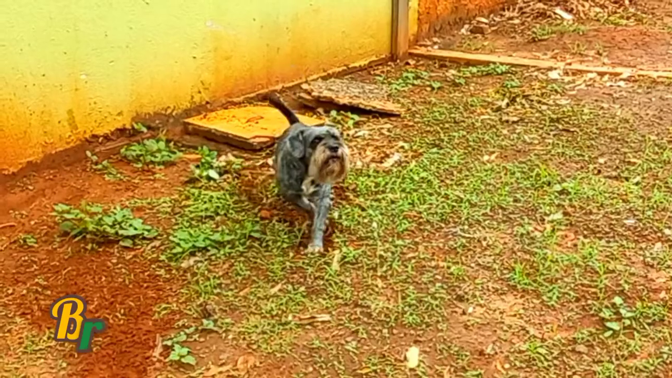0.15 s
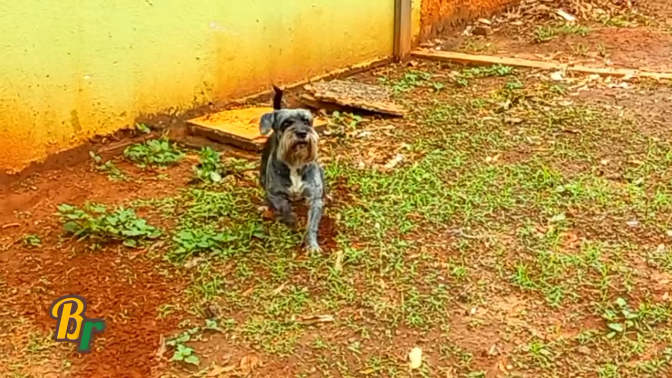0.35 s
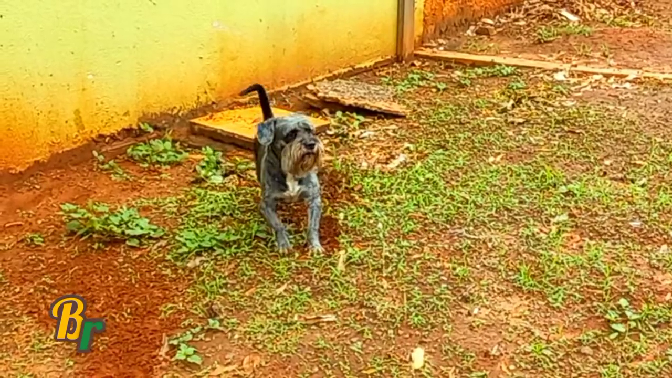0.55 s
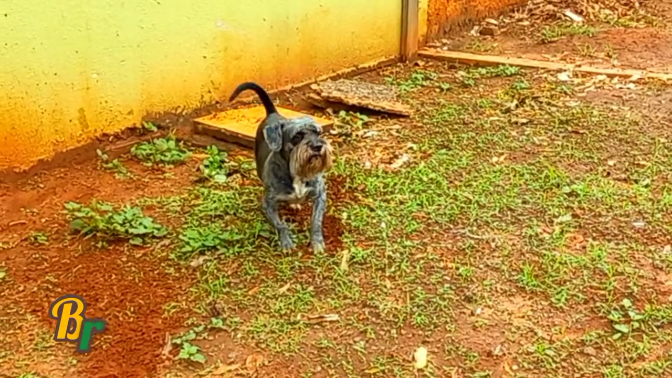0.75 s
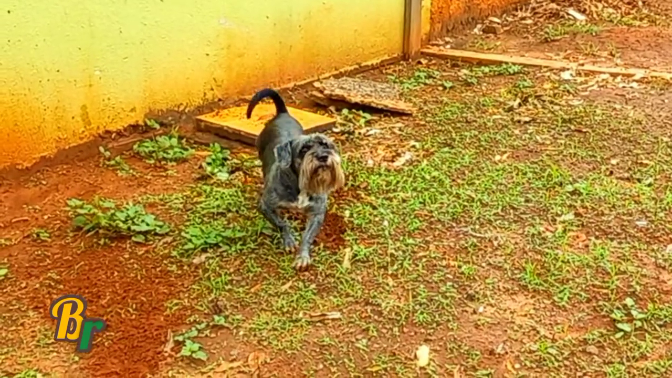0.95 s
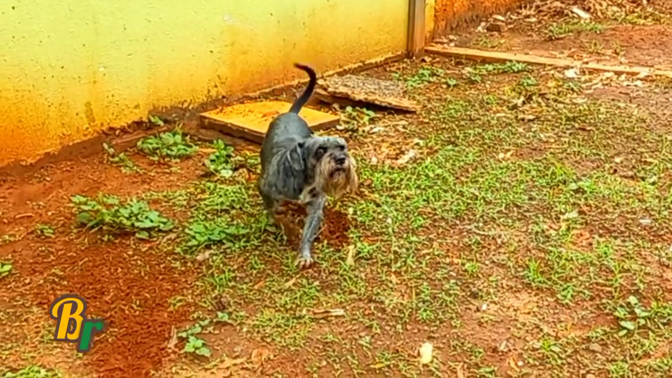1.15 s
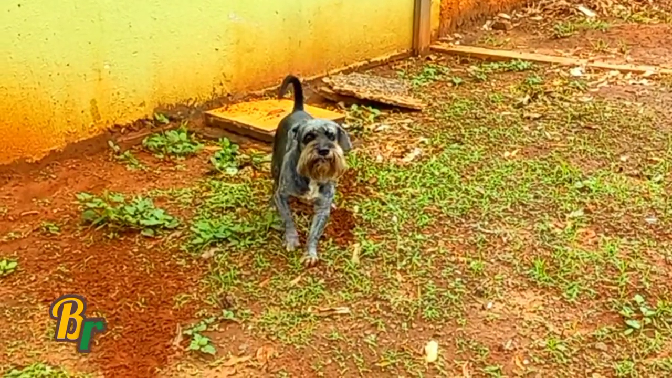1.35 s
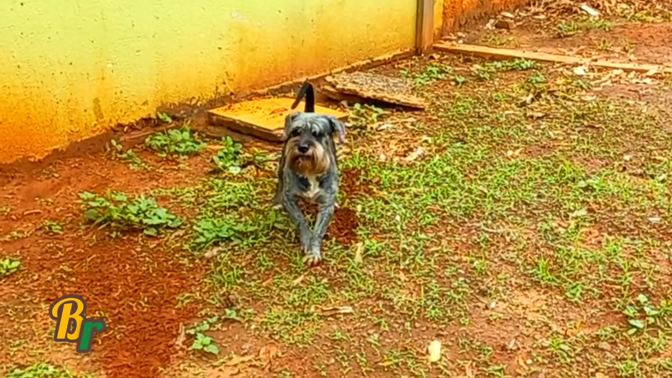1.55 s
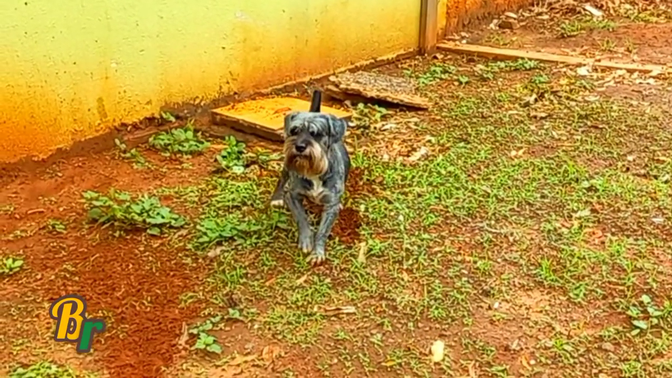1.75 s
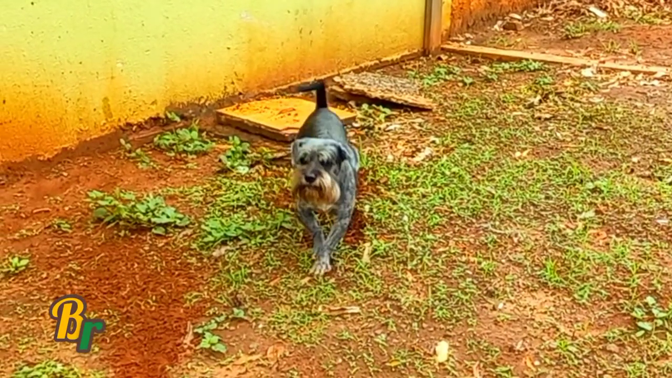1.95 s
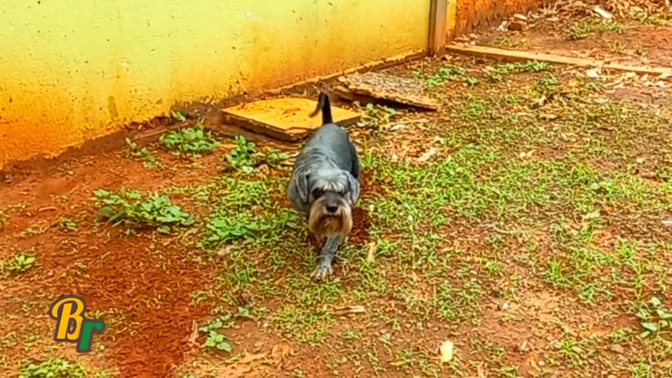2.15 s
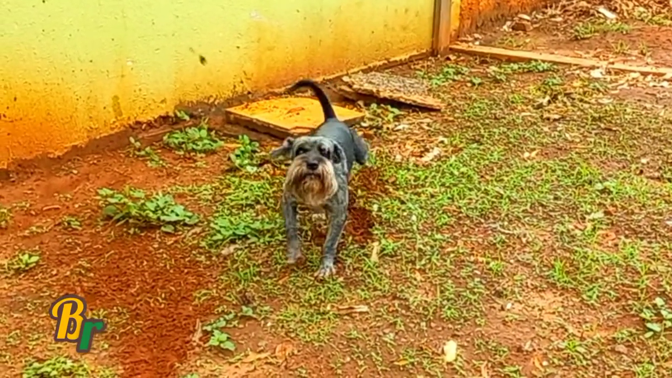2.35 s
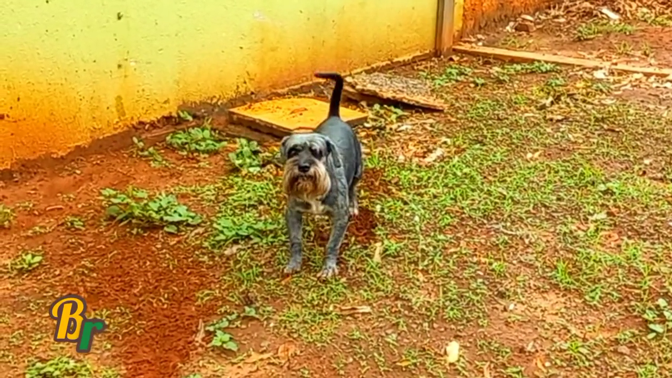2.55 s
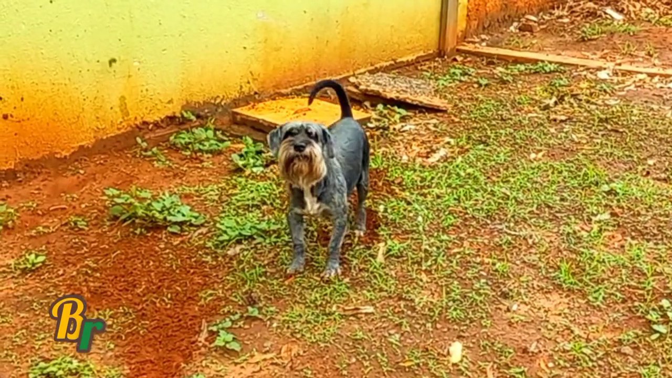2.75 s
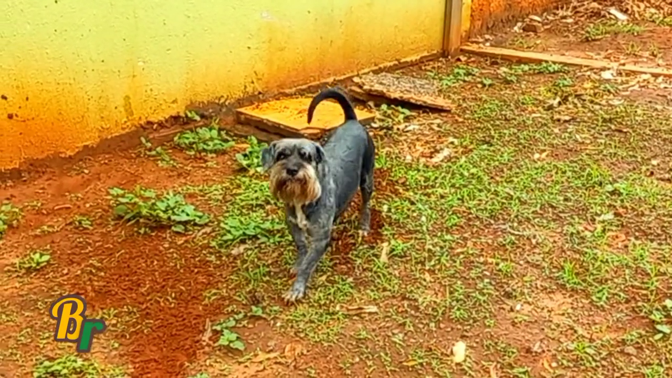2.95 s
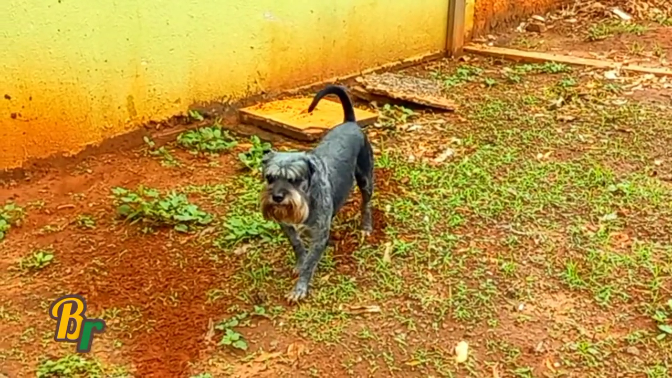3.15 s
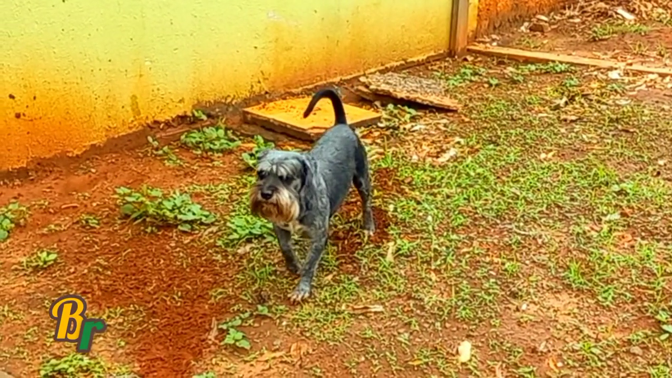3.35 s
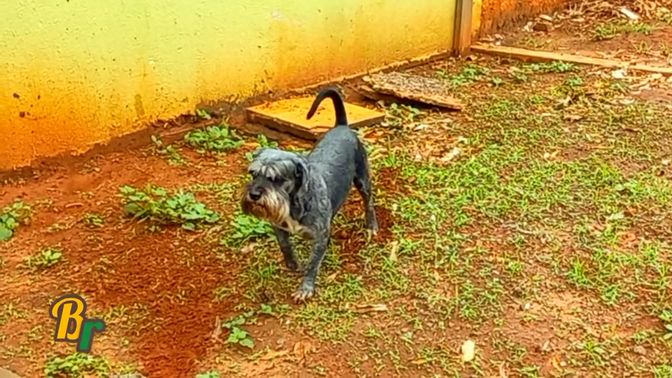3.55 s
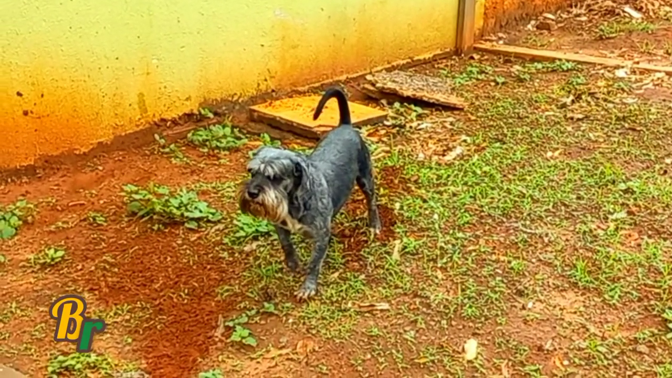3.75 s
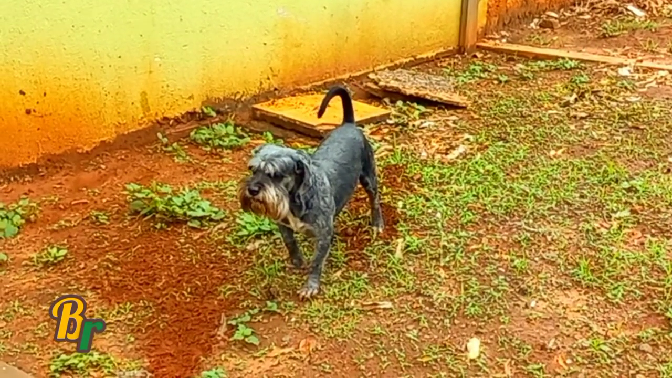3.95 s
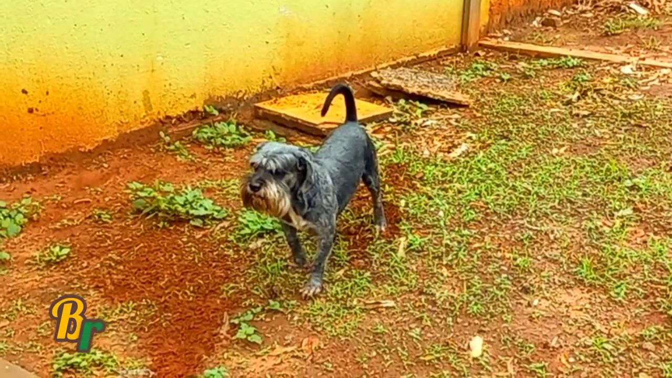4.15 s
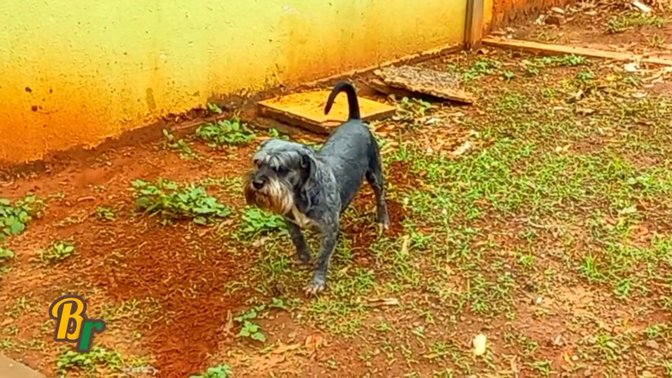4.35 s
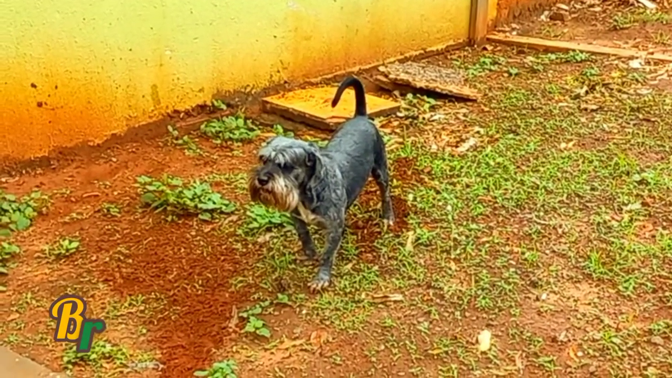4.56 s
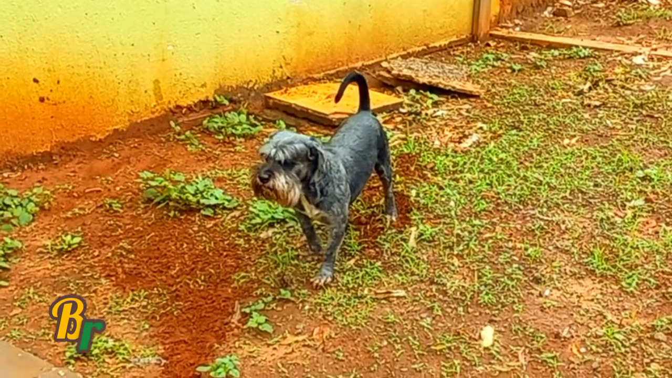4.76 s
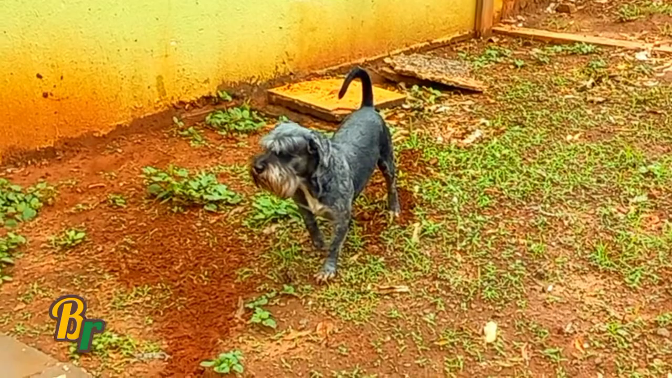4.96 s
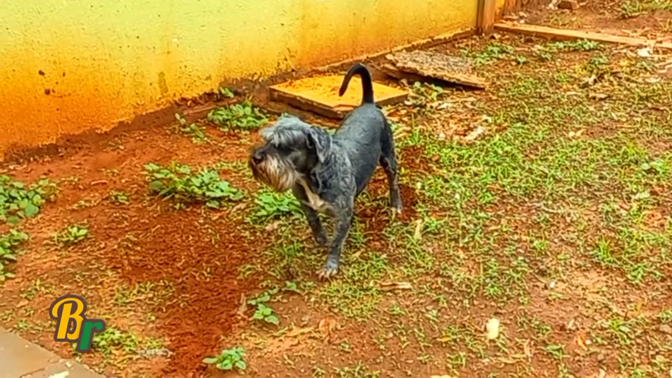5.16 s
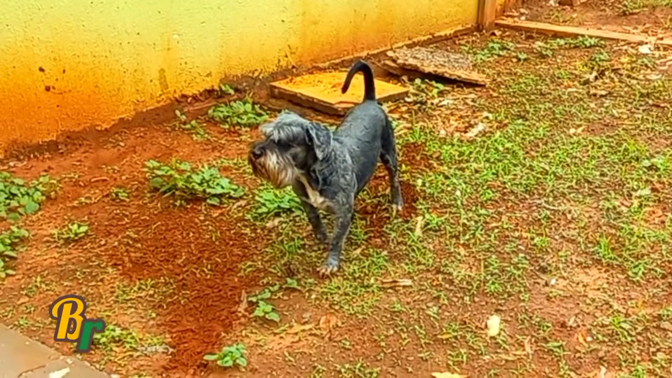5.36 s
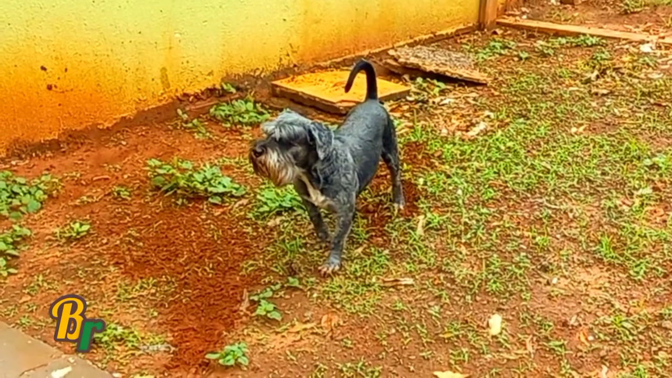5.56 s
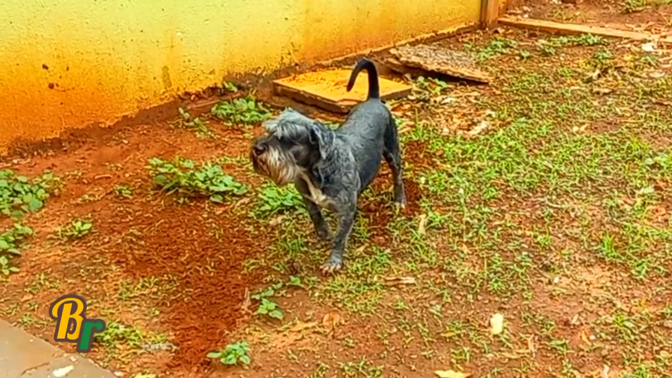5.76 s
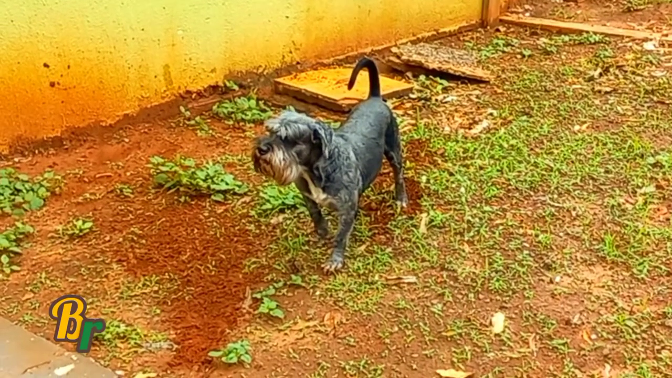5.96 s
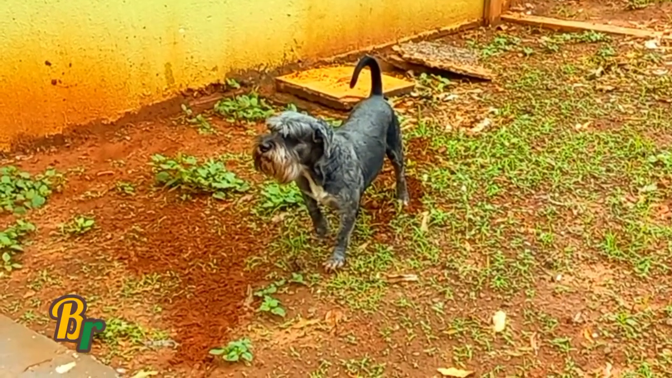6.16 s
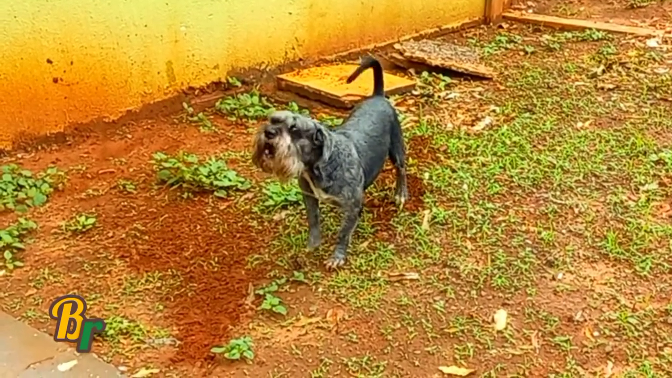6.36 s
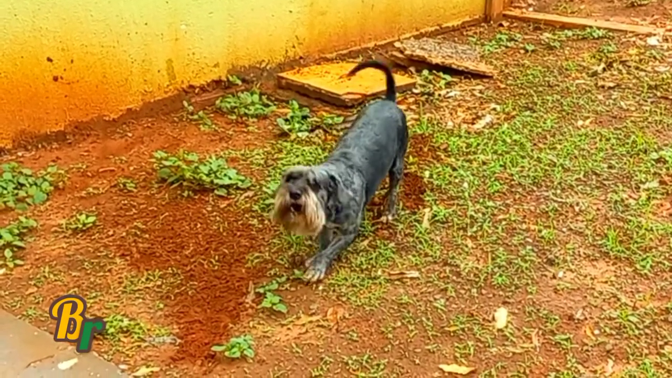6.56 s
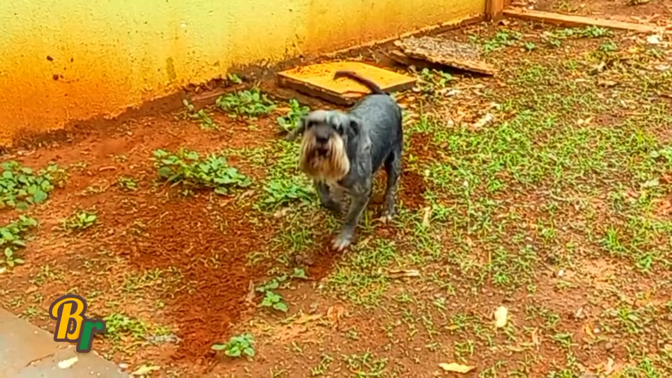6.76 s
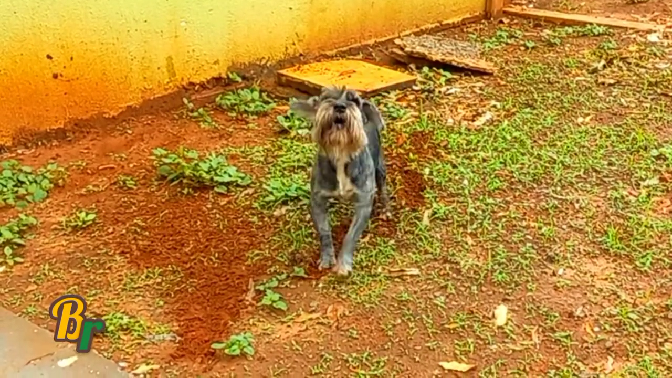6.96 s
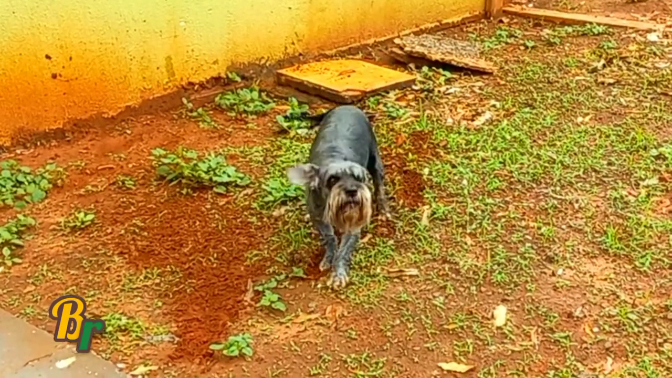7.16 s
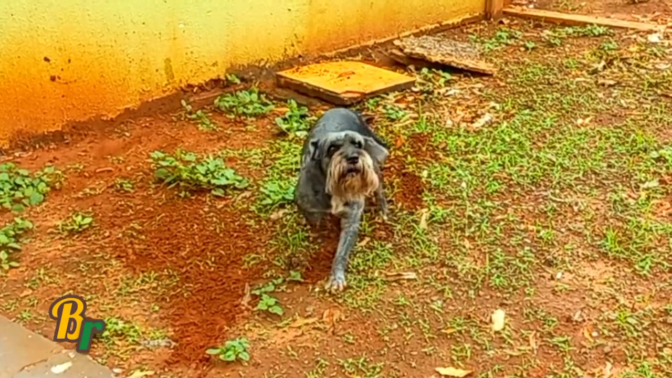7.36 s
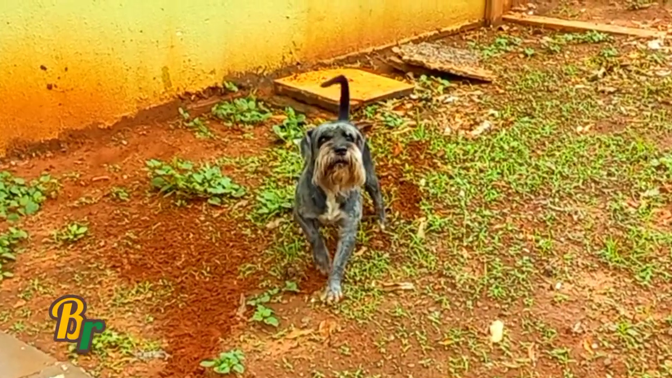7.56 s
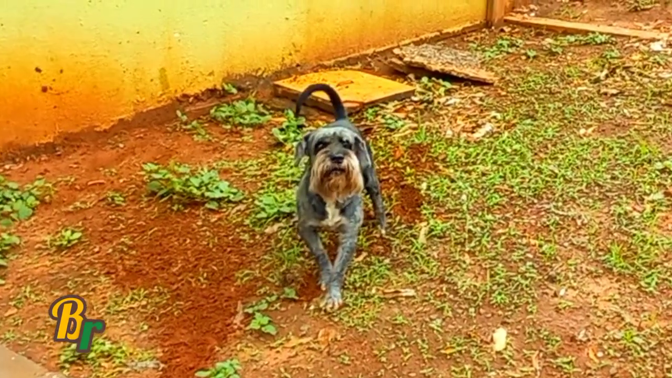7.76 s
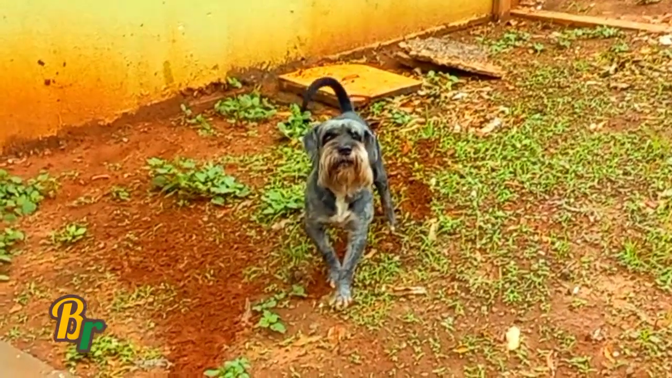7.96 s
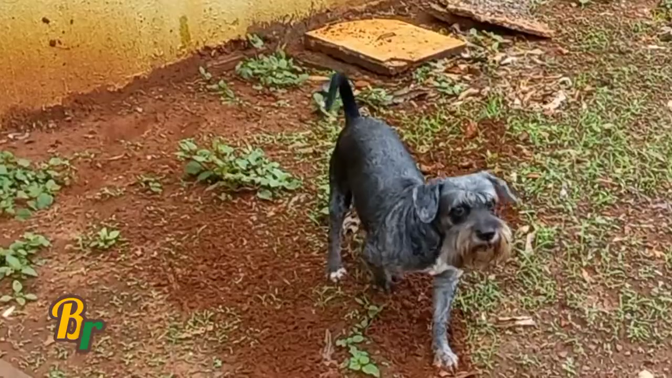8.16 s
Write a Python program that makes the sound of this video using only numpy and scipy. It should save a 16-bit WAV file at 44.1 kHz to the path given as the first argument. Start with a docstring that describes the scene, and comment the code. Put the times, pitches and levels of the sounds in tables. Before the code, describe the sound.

Sharp hoarse yaps from a nearby small dog, quiet throbbing growls and breaths between, with distant single barks and faint chirps outdoors.

```python
"""A walled yard: a small dog grunts, barks, gasps and growls, a farther dog answers and birds chirp.
The barks are throat harmonics, a second vibration and rasping air; the growls are low throbbing harmonics.
Breath is fluttering noise, the far dog rough pulses, the birds gliding whistles, paws and grit noise ticks.
The walls return a short tail; uneven low rumble and faint hiss lie under all, caught by a spaced
microphone pair. Near the end the sound drops out for a moment."""
import sys
import numpy as np
from scipy import signal
from scipy.fft import rfft, irfft
from scipy.io import wavfile
from scipy.ndimage import uniform_filter1d

SR = 44100
rng = np.random.default_rng(int(sys.argv[2]) if len(sys.argv) > 2 else 0)


def wrap_up_sound(samples):
    """Save the sound to the file named by the first command line argument, as 16-bit audio."""
    columns = np.atleast_2d(samples).T
    # keep every value between -1 and 1, then stretch to whole-number steps
    tamed = np.clip(columns, -1, 1)
    steps = np.round(tamed * 32767).astype(np.int16)
    wavfile.write(sys.argv[1], SR, steps)


N = 362061  # length [samples]

# The near dog's voice: an opening grunt, a voiced gasp and barks, one list each:
# (time [s], pitch [Hz], effort [dB], mouth opening as share of power above MOUTH_HZ [dB],
# treble re effort [dB], hoarse noise re effort [dB])
VOICE = [
    [(0.0, 280.9, -47, -13, -11, -4), (0.022, 288.1, -34, -28, -18.5, -13),
     (0.054, 275.8, -43.5, -15, -15.5, -2.5), (0.078, 275.8, -37.5, -20, -13, -6),
     (0.114, 283.9, -36.5, -9, -15, -17.5), (0.162, 269.2, -33, -18, -37, -13),
     (0.174, 254.8, -47, -7, -1, -13), (0.198, 213.2, -41, -11, -21, 2.5), (0.23, 183.3, -55.5, -1, 15, -3),
     (0.27, 141.3, -57.5, -14, 29, -11)],
    [(0.98, 290.6, -57.5, -6, -18, -11.5), (0.996, 323.9, -44, -3.5, -40, -13.5),
     (1.032, 463, -25, 0, -24, -14.5), (1.048, 525.4, -20, 2.5, -16.5, -14.5),
     (1.078, 561, -20, -1.5, -14.5, -10), (1.118, 556.2, -20, -3, -12, -8),
     (1.148, 535.5, -16.5, -16.5, -28.5, -7), (1.162, 463.7, -27, 8, -18.5, -11.5),
     (1.188, 293.5, -28, -22.5, -33, -15), (1.22, 289.3, -32, 0, -15, -11)],
    [(1.265, 277.1, -30.5, -12, -15, -7), (1.291, 273.2, -31.5, -18, -14, -17.5),
     (1.305, 265.3, -30, -21.5, -23, -14), (1.317, 246.4, -34, -26, -13, 3),
     (1.345, 200.4, -41.5, -19, -24, -24), (1.355, 190.9, -45, -11, -25, 1)],
    [(2.11, 269, -79.5, -13, -2, -13), (2.13, 310.3, -46, -11, -28.5, -1.5),
     (2.208, 499.9, -23, 3.5, -13.5, -24), (2.248, 542, -18, 0, -14, -11),
     (2.276, 584.2, -31, -10, -20.5, -11.5), (2.29, 513.8, -27, -5.5, -17, -10.5),
     (2.316, 371.5, -36.5, 0.5, -23, -14.5), (2.334, 283.3, -29, -12, -35, -12),
     (2.362, 270.9, -48.5, -9, -11, -7.5), (2.38, 261.7, -31, 1, -20, -13)],
    [(6.3, 286.8, -53, -19, -30, -6.5), (6.312, 301.7, -25.5, -21, -39.5, -16),
     (6.322, 319.8, -28.5, -2.5, -28, 1), (6.338, 476, -17, 18.5, -17.5, -21),
     (6.344, 514, -19, 1, -17.5, -10), (6.364, 578.6, -10.5, -2, -18.5, -17),
     (6.402, 565.1, -15.5, -4.5, -13.5, -16), (6.448, 528.8, -28.5, -5, -19, -9),
     (6.474, 333.6, -34.5, 2.5, -39, -19), (6.518, 295.3, -33.5, -12.5, -25, -6.5)],
    [(6.518, 308.1, -25, -0.5, -33, -10.5), (6.528, 409.2, -31, -2, -30, -10.5),
     (6.536, 479, -34.5, 4.5, -28, -10.5), (6.542, 502.4, -20, 6, -28, -14),
     (6.566, 544.9, -24, 3.5, -12.5, -14), (6.604, 584.4, -21.5, -0.5, -12.5, -15.5),
     (6.624, 559.2, -25, -0.5, -8.5, -16.5), (6.654, 528.7, -23, 12, -17.5, -12),
     (6.678, 527.2, -34.5, -0.5, -31.5, -7.5), (6.7, 492, -17, 1, -23, -7.5)],
    [(6.7, 490, -30.5, -4.5, -23, -5.5), (6.72, 490.9, -21.5, 1.5, -36.5, -4),
     (6.762, 529.8, -19, -4.5, -20, -12), (6.808, 553.6, -18, -18.5, -24, -5.5),
     (6.83, 609.3, -17, -19.5, -28, -21), (6.842, 598, -14.5, -21.5, -41, -17),
     (6.858, 534.8, -19, -29, -40, -9.5), (6.866, 471.6, -32.5, 9, -14.5, -14),
     (6.884, 324.5, -36, 2.5, -29, -10.5), (6.918, 285.4, -25.5, -10.5, -27.5, -18)],
    [(6.918, 296, -35.5, -13, -26, -8.5), (6.93, 356.4, -27, 7.5, -22.5, -10.5),
     (6.944, 443.3, -28.5, 20, -30, -6), (6.964, 524.5, -21.5, -32, -24, -13.5),
     (7.0, 642.2, -16, -12.5, -31, -5), (7.028, 683, -12.5, -23, -24.5, -24),
     (7.052, 598, -16.5, -37, -31, -22), (7.066, 538, -27.5, -7, -28, -19),
     (7.094, 366, -42, -1, -23, -20.5), (7.14, 292.2, -24.5, -7, -34, -33.5)],
    [(7.14, 301.2, -43.5, -7, -25, -22), (7.186, 512.4, -21, 3, -30.5, -13),
     (7.202, 561.3, -22, 2, -13, -8.5), (7.258, 547.7, -30, 2, -12, 4),
     (7.282, 612.3, -22.5, -20, -28, -11), (7.288, 598, -26.5, -27, -22, -18),
     (7.3, 494.5, -22, 5, -30, -8), (7.33, 273.9, -35, -1, -39, -16.5), (7.34, 249.0, -33, -22, -44, -14),
     (7.42, 224.2, -53.5, -12, -40, -9)],
]
# The colour of each of these sounds, in the same order: (chest tone under 400 Hz [dB],
# harmonics above 1300 Hz [dB], unsteadiness [dB], bite over the rasp [dB], main rasp resonance [Hz])
VOICE_COLOURS = [(12.5, -13, 2.5, 14, 4750), (3, -3.5, 3, 9.5, 4570), (22.5, -1.5, 0.5, -32, 4750),
                 (4.5, 0.5, 4, 3, 4650), (0.5, -1.5, 0, 11, 5180), (2.5, -8, 6, -2, 5150),
                 (-5.5, -11.5, -1, -1, 4950), (-1.5, -15, 0.5, 4, 5200), (4, -11, 3, -3, 5050)]
# A second vibration in the throat: (time [s], pitch [Hz], level [dB], sum tone with the folds [dB])
SECOND_VIBRATION = [
    [(1.02, 609, -36.5, -28.5), (1.06, 825.3, -23.5, -38.5), (1.1, 914, -22, -54), (1.128, 825, -27, -31),
     (1.15, 687.9, -30.5, -35.5)],
    [(2.17, 589, -42.5, -44), (2.2, 720.4, -28.5, -21), (2.24, 822, -26.5, -35.5), (2.27, 742.6, -27, -48)],
    [(6.36, 704, -36.5, -51), (6.374, 816, -18, -35.5), (6.39, 883, -22, -34), (6.42, 820, -25.5, -37.5),
     (6.44, 561, -19.5, -35)],
    [(6.55, 765, -32, -28), (6.596, 901.2, -22.5, -28.5), (6.634, 806.6, -30.5, -29),
     (6.68, 545, -30, -32.5)],
    [(6.73, 604.8, -33.5, -37), (6.752, 692.7, -23.5, -43.5), (6.79, 848, -17.5, -29),
     (6.82, 759, -21.5, -37.5), (6.84, 622.5, -14, -36.5)],
    [(6.945, 700, -25, -51.5), (6.97, 870.3, -23, -41.5), (7.01, 966.3, -24.5, -47.5),
     (7.025, 927, -33, -44)],
    [(7.19, 629, -35, -65), (7.212, 683, -30, -26), (7.25, 798.4, -22, -43.5), (7.29, 589, -15.5, -40)],
]
DIFFERENCE_DB = -22  # the difference tone, re the sum tone
# Lower throat resonances, for the hoarse noise: (frequency [Hz], width [Hz], level [dB])
HOARSE_RESONANCES = [(590, 61, 14.5), (912, 67, 10.5), (1565, 380, 0.5), (2330, 190, -32)]
# Upper throat resonances, tuned for a main one at 5100 Hz and moving with it:
# (frequency [Hz], width before tripling [Hz], level [dB])
RASP_RESONANCES = [(2410, 180, -16.5), (3450, 160, -3.5), (3788, 53, 0.5), (5930, 48, -7),
                   (6680, 47, -15.5), (7650, 230, -15.5), (12050, 600, -15.5)]


def voice():
    """Clean low harmonics, a second vibration that mixes with them, and air puffed out once a cycle."""
    points = [[(*point, *own) for point in rows] for rows, own in zip(VOICE, VOICE_COLOURS)]
    gate, columns = curves(points)
    hz, effort_db, open_db, treble_db, hoarse_db, chest_db, bright_db, shake_db, bite_db, rasp_hz = columns
    turns = np.cumsum(hz * (1 + .012 * wobble(60))) / SR

    # the 4th to 6th harmonics waver together
    unsteady = [.4 * wobble(60), .8 * wobble(60), wobble(60), *[1.3 * wobble(60)] * 3]
    gains = harmonic_gains(hz, open_db, chest_db, bright_db)
    folds = 0
    for n, (gain, u) in enumerate(zip(gains, unsteady), 1):
        waver_db = shake_db * 1.5 * np.tanh(u / 1.5)
        folds = folds + gain * tone(n * turns, effort_db + waver_db)

    second_gate, (second_hz, second_db, sum_db) = curves(SECOND_VIBRATION, edge=.014)
    second_turns = np.cumsum(second_hz * (1 + .015 * wobble(60))) / SR
    second = tone(second_turns, second_db)
    second += tone(second_turns + turns, sum_db)
    second += tone(second_turns + 2 * turns, sum_db - 13.5)
    second += tone(second_turns - turns, sum_db + DIFFERENCE_DB)

    puffs = (0.13 + np.exp(-(turns % 1) / 0.062)) * rng.standard_normal(N)
    # the folds close less evenly while both vibrations sound
    uneven = turns + (.005 + .013 * second_gate) * wobble(250)
    clicks = sum(np.cos(2 * np.pi * k * uneven) for k in range(4, 16))
    clicks *= 1 + second_gate * np.cos(2 * np.pi * second_turns)

    hoarse = sum(amp(db) * resonate(puffs, f, width) for f, width, db in HOARSE_RESONANCES)
    upper = [amp(db) * evened(resonate(puffs + .5 * clicks, f * rasp_hz / 5100, 3.0 * width))
             for f, width, db in RASP_RESONANCES]
    bite = sum(upper[:3])  # the three lowest
    rasp = sum(upper[3:]) + evened(resonate(puffs + 2.2 * clicks, rasp_hz, 420))
    rasp = evened(rasp) + 0.77 * evened(colour(puffs, BREATH_COLOUR))
    treble = (evened(rasp) + amp(bite_db) * evened(bite)) / np.sqrt(1 + amp(2 * bite_db))

    noise = amp(effort_db + hoarse_db) * evened(hoarse) + amp(effort_db + treble_db) * treble
    return gate * (folds + noise) + second_gate * second


MOUTH_HZ = 760  # the mouth opening favours harmonics above this
# The throat's colour over the voice's harmonics: (frequency [Hz], level [dB])
THROAT = [(150, -9), (290, -5), (580, 7.5), (800, 1.5), (1130, 0.5), (1400, -17), (1720, -4), (2050, -20),
          (2900, -32.5)]


def harmonic_gains(hz, open_db, chest_db, bright_db):
    """Six harmonics: the throat colours them, the mouth splits the power between low and high ones."""
    step, t = 32, np.arange(N)  # worked out at every 32nd sample
    hz = np.arange(1, 7)[:, None] * hz[::step]
    colour_db = read(THROAT, hz) + chest_db[::step] * (hz < 400) + bright_db[::step] * (hz > 1300)
    power = amp(2 * colour_db)
    upper_share = np.clip(amp(2 * open_db[::step]), .001, .99)
    high = 1 / (1 + (MOUTH_HZ / hz) ** 12)
    high_gain = upper_share * high / (power * high).sum(0)
    low_gain = (1 - upper_share) * (1 - high) / (power * (1 - high)).sum(0)
    power = power * (high_gain + low_gain)
    return [np.interp(t, t[::step], uniform_filter1d(np.sqrt(p), size=9)) for p in power]


# Growls, one list each: (time [s], pitch [Hz], effort [dB],
# mouth opening as level of the 3rd harmonic re effort [dB])
GROWLS = [
    [(3.22, 189.6, -58, -20), (3.272, 202.3, -54, -20), (3.414, 197.1, -54, -20.5),
     (3.48, 182.6, -51.5, -26.5), (3.72, 194.7, -51.5, -21), (3.944, 163.9, -52, -23.5),
     (4.138, 157.4, -53, -27), (4.29, 162.3, -52, -23), (4.418, 193.1, -49.5, -25),
     (4.508, 235.6, -49.5, 1.5), (4.588, 199.5, -49, -6), (4.73, 180.2, -53, -26.5),
     (4.844, 164.1, -53, -24.5), (4.886, 147.5, -51.5, -35.5), (4.92, 153.4, -64, -15)],
    [(7.405, 225.6, -54, 5), (7.423, 222.1, -49, 5), (7.485, 235.6, -50.5, 9), (7.531, 228.8, -51, 9),
     (7.641, 182.4, -56.5, 4.5), (7.783, 172.8, -61, -0.5), (7.87, 141, -67, -3)],
]
# The nose lifts the 2nd harmonic: (frequency [Hz], level re effort [dB])
NOSE = [(290, -6), (320, -2), (360, -11.5), (400, -19.5), (470, -16.5)]
THROBS_PER_S = 20
OPEN_SLOPE = 1.23  # dB on the 2nd and 4th harmonic for each dB of opening
SECOND_OPEN_DB, FOURTH_DB = -13.5, -8.5  # their levels at an opening of 0 dB; the nose may lift the 2nd more


def growls():
    """Low harmonics from a mouth that opens and closes, throbbing as the soft palate flaps."""
    gate, (hz, effort_db, open_db) = curves(GROWLS, edge=0.013)
    second_db = np.maximum(read(NOSE, 2 * hz), OPEN_SLOPE * open_db + SECOND_OPEN_DB)
    fourth_db = OPEN_SLOPE * open_db + FOURTH_DB
    levels_db = effort_db + np.array([0 * hz, second_db, open_db, fourth_db])
    turns = np.cumsum(hz * (1 + 0.03 * wobble(40))) / SR
    throb = np.cos(2 * np.pi * np.cumsum(THROBS_PER_S * (1 + 0.12 * wobble(14.7))) / SR)
    out = np.zeros(N)
    for k, (db, depth) in enumerate(zip(levels_db, (0.52, 0.1, 0.057, 0.42)), 1):
        out += (1 + depth * throb) * (1 + 0.3 * wobble(71)) * tone(k * turns, db)
    return gate * out


# Breath through nose and mouth: (start [s], top [s], end [s], hiss [dB], sizzle above 7 kHz [dB],
# chesty puff [dB]), levels at the top
BREATHS = [(0.03, .21, 0.38, -51, -54, -45.5), (.32, .368, 1.14, -62.5, -68, -59.5),
           (1.2, 1.285, 1.46, -50, -52.5, -38.5), (2.32, 2.44, 2.526, -43, -49, -36.5),
           (4.45, 4.57, 4.7, -59, -65.5, -65), (4.72, 4.825, 5.08, -62, -82, -65),
           (7.88, 7.99, 8.18, -60.5, -63, -64.5)]
# The colour of rushing air, also heard in the voice: (frequency [Hz], level [dB])
BREATH_COLOUR = [(710, -26.5), (1200, -19.5), (1320, -13.5), (2170, -11), (3060, -14.5), (3880, -0.5),
                 (5770, -24.5), (6500, 0.5), (8230, -26.5), (11500, -18), (15700, -22.5)]
BREATH_START_DB, BREATH_END_DB = -9.5, -34  # re the top


def breaths():
    """An air jet's fluttering hiss and sizzle over a low resonant puff."""
    gate, (hiss_db, sizzle_db, puff_db) = curves(arches(BREATHS, BREATH_START_DB, BREATH_END_DB), edge=0.046)
    air_jet = colour(rng.standard_normal(N), BREATH_COLOUR) * amp(2.1 * wobble(88))
    hiss = evened(colour(air_jet, [(5500, 0), (7500, -30)]))
    sizzle = evened(colour(air_jet, [(5500, -30), (7500, 0)]))
    puff = evened(resonate(rng.standard_normal(N), 170, 250))
    return gate * (amp(hiss_db) * hiss + amp(sizzle_db) * sizzle + amp(puff_db) * puff)


# Ticks of paws and grit: (time [s], peak level [dB], centre [Hz])
TICKS = [(0.223, -24.5, 2092), (0.3547, -36.5, 3460), (0.403, -58, 3230), (0.8575, -52.5, 3200),
         (0.9188, -49.5, 5680), (1.9196, -42.5, 4455), (2.9655, -57, 1600), (3.3623, -56.5, 5170),
         (4.7212, -52.5, 4780), (5.7489, -56, 4317), (5.8084, -58.5, 4160)]


def ticks():
    """Short noise bursts about a centre frequency, dying away in milliseconds."""
    out, t = np.zeros(N), np.arange(600) / SR
    for (s, db, hz), noise in zip(TICKS, rng.standard_normal((len(TICKS), 600))):
        burst = noise * (.5 + np.sin(2 * np.pi * hz * t)) * np.exp(-t / 0.0077)
        burst = colour(burst, [(800, -37.5), (2000, 2.0), (8000, -16), (15000, -14)])
        out[round(s * SR):][:600] += amp(db) * burst / abs(burst).max()
    return out


# The far dog: barks, and at the end the faint tail of some bark: (start [s], top [s], end [s],
# effort [dB], first throat resonance [Hz], brightness [dB]), values at the top
FAR_VOICE = [(0.062, .112, 0.23, -25.5, 540.6, -10), (1.552, 1.601, 1.774, -27, 569, -7.5),
             (2.654, 2.699, 2.937, -30.5, 577, -7), (5.989, 6.037, 6.233, -27.5, 529.7, -8.5),
             (8.128, 8.135, 8.26, -50.5, 594, -7.5)]
# Its fixed upper throat: (frequency [Hz], level [dB])
FAR_UPPER_THROAT = [(530, -47.5), (900, -0.5), (1220, -13.5), (1720, -8), (1840, -15.5), (2100, -15.5),
                    (2470, -20), (2700, -18), (3090, -29.5), (3370, -14.5), (3570, -26), (4670, -43.5),
                    (6740, -34.5), (9000, -50.5), (11700, -72), (19800, -120)]
FAR_START_DB, FAR_END_DB = -10.5, -32  # effort re the top
DULL_START_DB, BRIGHT_END_DB = -13, 11  # brightness re the top
FAR_SAG = 0.11  # share by which the first resonance sinks at the end


def far_dog():
    """Rough, uneven pulses through a moving resonance and a fixed upper throat."""
    start = (FAR_START_DB, 0, DULL_START_DB, 0)
    end = (FAR_END_DB, 0, BRIGHT_END_DB, FAR_SAG)
    rows = arches([(*row, 0) for row in FAR_VOICE], start, end)
    gate, (effort_db, hz, bright_db, sag) = curves(rows, edge=.015)
    turns = np.cumsum(190 * (1 + .3 * wobble(50))) / SR
    puffs = (.3 + np.exp(-(turns % 1) / .25)) * (.4 + rng.standard_normal(N)) * amp(2.5 * wobble(40))
    body = evened(colour(resonate(puffs, hz * (1 - sag), 220), [(150, -30), (320, 0)]))
    upper = evened(colour(puffs, FAR_UPPER_THROAT))
    return gate * amp(effort_db) * (body + amp(bright_db) * upper)


# Four bird calls, note by note, before stretch and pitch factor:
# (start [s], length [s], start pitch [Hz], end pitch [Hz], level re the call [dB])
TUMBLE = [(0, 0.034, 4350, 4000, 0), (.028, 0.027, 3830, 3300, 1.5), (.052, .033, 2900, 3700, 2),
          (.085, .012, 2762, 2550, -9.5)]
FLICK = [(0, .02, 3707, 5256, -2), (.022, 0.036, 5367, 4677, -4)]
RISE = [(0.0025, .035, 3400, 4700, 0)]
STEP = [(0, 0.046, 4090, 4210, -0.64), (.035, 0.024, 3665, 3405, -2)]
# When each call sounds: (time [s], stretch in time [ratio], pitch factor [ratio], level [dB])
TUMBLES = [(0.679, 1.22, 0.98, -65), (1.434, 1.16, 0.97, -63), (3.03, 1.02, 0.97, -64),
           (3.83, 0.94, 1.01, -62), (4.433, 1.1, 1.05, -66), (5.318, 1.13, 1.02, -65),
           (7.417, 1.02, 1.02, -65)]
FLICKS = [(1.824, 1.38, 1.02, -62), (3.384, 1.6, 1.09, -62.5), (4.188, 1.18, 1.02, -62),
          (4.941, 0.87, 0.93, -61), (5.7, 0.77, .97, -62), (6.105, 0.62, 0.95, -50.5),
          (7.792, 1.1, 1, -67.5)]
RISES = [(1.915, 1, 1, -64.5), (3.495, 1, 1.1, -60), (4.272, 1.1, 1.08, -59), (5.02, 1, 0.92, -65),
         (5.765, .6, 1.03, -62), (7.896, 1.2, 1.13, -64.5)]
STEPS = [(0.567, 1.34, .98, -62), (0.801, 1.4, 0.94, -65.5), (3.181, 0.74, 1.02, -62.5),
         (4.0, 1.22, 1.02, -63.5), (4.635, 0.71, 0.91, -58.5), (4.725, 1.4, 1.07, -62.5),
         (5.393, 0.8, 1.02, -62.5), (7.62, 0.88, 1.03, -68.5)]
# Single whistles: (time [s], length [s], start pitch [Hz], end pitch [Hz], level [dB])
SINGLE_NOTES = [(1.881, .041, 5310, 3440, -65), (3.227, 0.026, 3610, 3680, -64.5),
                (3.444, 0.027, 5600, 3840, -59), (4.04, 0.095, 7470, 5850, -74.5),
                (4.13, 0.065, 5900, 5280, -69.5), (5.36, 0.02, 5500, 5700, -71),
                (5.784, 0.013, 4300, 3800, -61.5), (4.425, 0.02, 5430, 5090, -62),
                (4.598, .021, 4170, 4636, -64)]


def birds():
    """Short gliding whistles: four calls that return, and a few single notes."""
    out, waver = np.zeros(N), 1 + 0.026 * wobble(200)
    notes = list(SINGLE_NOTES)
    for call, times in ((TUMBLE, TUMBLES), (FLICK, FLICKS), (RISE, RISES), (STEP, STEPS)):
        for s, stretch, pitch, db in times:
            notes += [(s + stretch * at, stretch * length, pitch * a, pitch * b, db + note_db)
                      for at, length, a, b, note_db in call]
    for s, length, start_hz, end_hz, db in notes:
        first, count = round(s * SR), round(length * SR)
        hz = np.linspace(start_hz, end_hz, count) * waver[first:][:count]
        out[first:][:len(hz)] += tone(np.cumsum(hz) / SR, db) * signal.windows.tukey(len(hz), .6)
    return out * amp(4.5 * wobble(92))


# How fast the yard's tail dies: (frequency [Hz], time to fall 60 dB [s])
YARD_DECAY = [(200, 0.33), (600, 0.66), (1500, 0.74), (3000, 0.5), (5000, 0.54), (10000, 0.4)]


def yard(x):
    """Wall echoes as sparse taps of random sign, each band dying at its own speed."""
    taps = np.zeros((2, SR))
    at = np.arange(500, SR - 20, 20) + rng.integers(0, 20, (2, (SR - 501) // 20))
    np.put_along_axis(taps, at, rng.choice([-1., 1.], at.shape), 1)
    hz, t, z = signal.stft(taps, SR, nperseg=256)
    tail = signal.istft(z * amp(-60 * t / read(YARD_DECAY, hz)[:, None]), SR, nperseg=256)[1]
    tail = tail + .5 * tail[::-1]  # each side hears some of the other
    return signal.fftconvolve(x[None], tail / np.linalg.norm(tail[0]), axes=1)[:, :N]


# The colour of the background: (frequency [Hz], relative level [dB])
AIR_COLOUR = [(15, -80), (25, -31.5), (43, -24), (70, 0.5), (99, -7.5), (148, -15.5), (184, -21.5),
              (222, -18), (370, -31.5), (402, -33.5), (688, -40), (2870, -42.5), (3560, -38.5), (5200, -34),
              (15700, -61.5)]
AIR_DB = -55.5  # rms level ahead of the microphones
# Uneven rumble and hiss levels, played about their averages, the hiss partly following the barks
# and their echoes: (time [s], rumble [dB], hiss [dB])
RUMBLE_AND_HISS = [(0.0, -54, -73.5), (0.84, -64.5, -87), (1.23, -56.5, -73), (1.42, -56, -94.5),
                   (2.22, -62, -78.5), (2.31, -62, -70.5), (2.74, -53.5, -84.5), (2.9, -61, -87),
                   (3.68, -56.5, -88.5), (4.66, -56.5, -81.5), (5.03, -66.5, -95.5), (5.65, -62, -96.5),
                   (6.35, -55, -86), (6.56, -62, -79), (6.79, -63, -80), (7.5, -57, -88), (8.03, -63, -81),
                   (8.21, -51, -93)]
# How alike left and right are: (frequency [Hz], likeness [0-1])
LIKENESS = [(60, .92), (200, .95), (500, .6), (1200, .05), (15000, 0)]


def air():
    """Random short-time spectra with drifting patches, under uneven rumble and hiss levels."""
    frames, hz = N // 512 + 5, np.fft.rfftfreq(2048, 1 / SR)
    a, b, c, d, patches = rng.standard_normal((frames, 1025, 5)).T
    patches = evened(uniform_filter1d(uniform_filter1d(patches, 12, 0), 8, 1))

    s, rumble_db, hiss_db = np.transpose(RUMBLE_AND_HISS)
    t = np.arange(frames) * 512 / SR
    low = 1 / (1 + (hz[:, None] / 400) ** 2)
    rumble_change = np.interp(t, s, rumble_db - rumble_db.mean())
    hiss_change = np.interp(t, s, hiss_db - hiss_db.mean())
    change_db = low * rumble_change + (1 - low) * hiss_change

    same = np.clip(read(LIKENESS, hz), -1, 1)[:, None]
    left = a + 1j * b
    right = same * left + np.sqrt(1 - same ** 2) * (c + 1j * d)
    z = np.array([left, right]) * amp(read(AIR_COLOUR, hz)[:, None] + 2.5 * patches + change_db)
    return amp(AIR_DB) * evened(signal.istft(z, nperseg=2048, noverlap=1536)[1][:, :N])


def amp(db):
    """Decibels to gain."""
    return 10 ** (np.asarray(db) / 20)


def evened(x):
    """Scales to rms 1."""
    return x / np.sqrt(np.mean(x ** 2) + 1e-20)


def read(points, hz):
    """Reads a table on a log frequency axis."""
    f, value = np.transpose(points)
    return np.interp(np.log(hz + 1), np.log(f + 1), value)


def colour(x, points):
    """Filters by a table of (frequency [Hz], level [dB])."""
    return irfft(rfft(x) * amp(read(points, np.fft.rfftfreq(len(x), 1 / SR))), len(x))


def curves(tables, edge=0.024):
    """A gate open during the tables (edge in s), and their lightly smoothed columns at every sample."""
    t, gate = np.arange(N) / SR, np.zeros(N)
    for rows in tables:
        gate[(t >= rows[0][0]) & (t <= rows[-1][0])] = 1
    s, *columns = np.concatenate(tables).T
    smooth = [uniform_filter1d(np.interp(t, s, c), size=400) for c in columns]
    return uniform_filter1d(uniform_filter1d(gate, int(edge * SR)), size=100), smooth


def arches(rows, start, end):
    """Three-point curves from rows (start [s], top [s], end [s], values..), shifted at both ends."""
    return [[(a, *np.add(top, start)), (b, *top), (c, *np.add(top, end))] for a, b, c, *top in rows]


def wobble(cutoff_hz):
    """Smooth random drift of rms 1: noise through a lowpass."""
    return evened(signal.lfilter(*signal.butter(2, cutoff_hz, fs=SR), rng.standard_normal(N)))


def resonate(x, hz, width):
    """A resonance that may move: shifts the curve hz down to zero, smooths twice, and shifts back."""
    turn = np.exp(2j * np.pi * np.cumsum(hz * np.ones(N)) / SR)
    r = np.exp(-np.pi * width / SR)
    return 2 * (turn * signal.lfilter([(1 - r) ** 2], [1, -2 * r, r * r], x / turn)).real


def tone(turns, db):
    """A sine of the given rms level."""
    return np.sqrt(2) * amp(db) * np.cos(2 * np.pi * turns)


def pair(x, phase, left_db):
    """Places a source by its phase lead [radians] and level [dB] at the left microphone."""
    left = irfft(rfft(x) * amp(left_db / 2) * np.exp(1j * phase), N)
    return np.array([left, irfft(rfft(x) * amp(-left_db / 2), N)])


# The near dog's lead at the left microphone: (frequency [Hz], phase [radians])
DOG_LEAD = [(0, 0), (600, .9), (1250, 1.2), (1750, 1.8), (2070, 5.2), (3200, 7.1), (4600, 12.2),
            (5300, 13.5), (10000, 24), (16000, 40)]
# Left minus right for the near dog: (frequency [Hz], level [dB])
DOG_SHADE = [(200, 0), (600, 1.2), (1500, -1), (4000, -5), (12000, -6)]
# The near dog's share thrown back by the walls: (frequency [Hz], level [dB])
WALLS = [(200, -19.5), (570, -14), (1100, -23), (2500, -14.5), (6000, -18)]
FAR_LEAD_S, BIRD_LEAD_S = .00045, .00003  # the left microphone hears these first
FAR_TAIL_DB, BIRD_TAIL_DB = -9, -2.5  # sent to the yard


def scene():
    """The near dog is mostly dry, the far dog and the birds carry much tail."""
    dog, far, song = voice() + growls() + breaths() + ticks(), far_dog(), birds()
    hz = np.fft.rfftfreq(N, 1 / SR)
    direct = pair(dog, np.interp(hz, *np.transpose(DOG_LEAD)), read(DOG_SHADE, hz))
    direct += pair(far, 2 * np.pi * hz * FAR_LEAD_S, -3.5)
    direct += pair(song, 2 * np.pi * hz * BIRD_LEAD_S, -1.5)
    echoes = yard(colour(dog, WALLS) + amp(FAR_TAIL_DB) * far + amp(BIRD_TAIL_DB) * song)
    return direct + echoes + air()


CUT_S, CUT_HALF_S = 8.118, .008  # a cut: the sound drops out for a moment (centre, half length)
EDGE_HZ = 15850  # upper band limit


def record(dry):
    """The microphones lose the deepest bass; at a cut the sound drops out; then the band limit."""
    dry = signal.sosfilt(signal.butter(3, 45, "high", fs=SR, output="sos"), dry)
    cut = 1 - np.exp(-((np.arange(N) / SR - CUT_S) / CUT_HALF_S) ** 4)
    lowpass = signal.firwin(511, EDGE_HZ, window=("kaiser", 9), fs=SR)
    return signal.oaconvolve(dry * cut, lowpass[None], "same")


dry = scene()
out = record(dry)
wrap_up_sound(out)
```